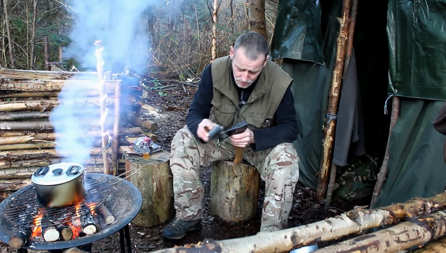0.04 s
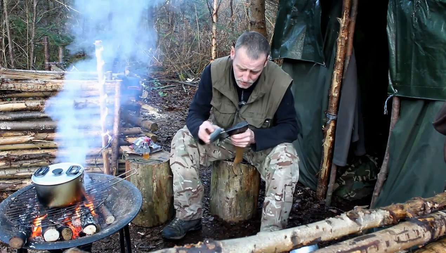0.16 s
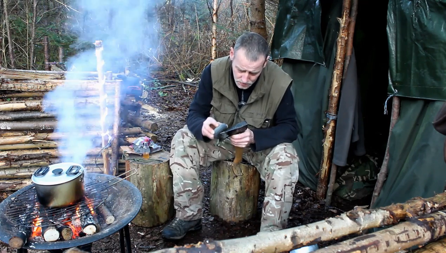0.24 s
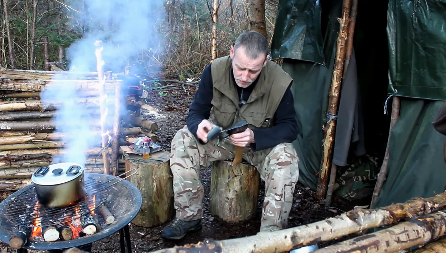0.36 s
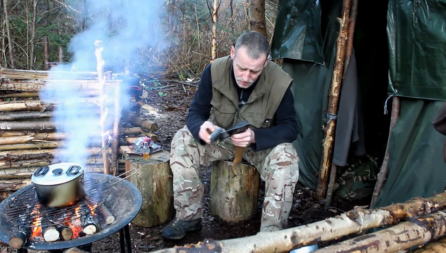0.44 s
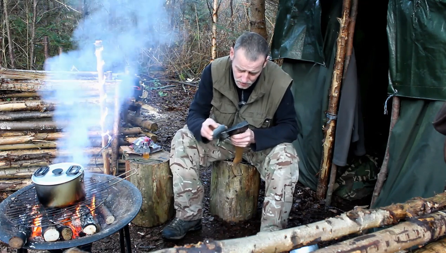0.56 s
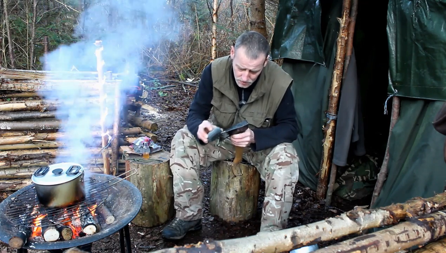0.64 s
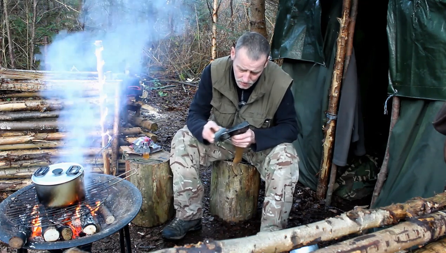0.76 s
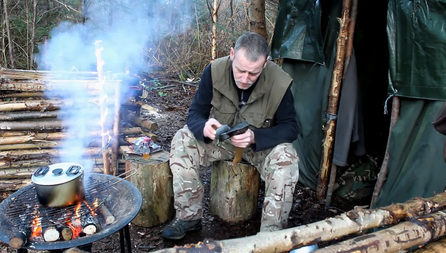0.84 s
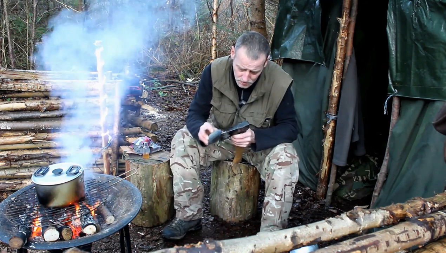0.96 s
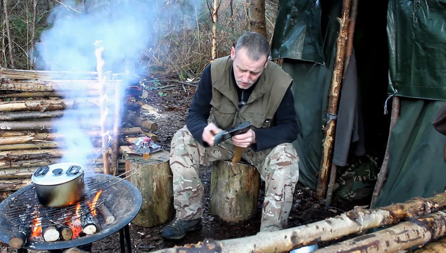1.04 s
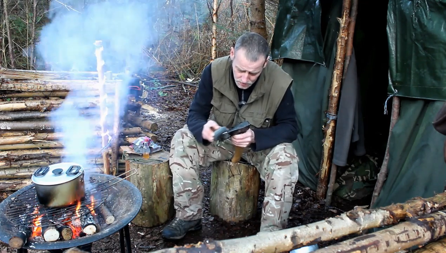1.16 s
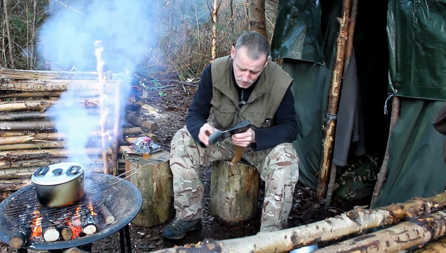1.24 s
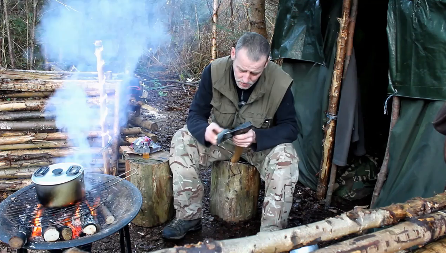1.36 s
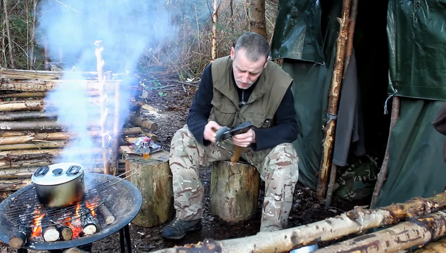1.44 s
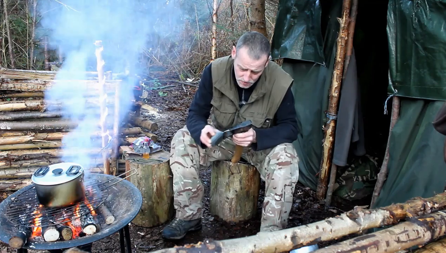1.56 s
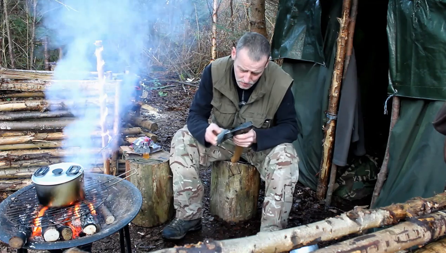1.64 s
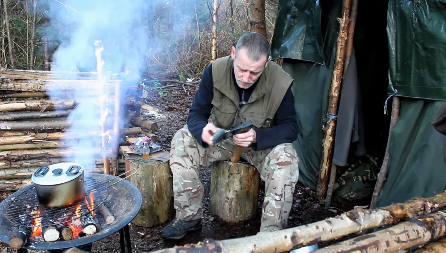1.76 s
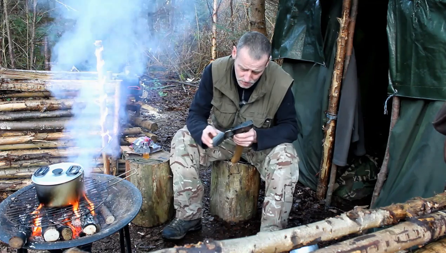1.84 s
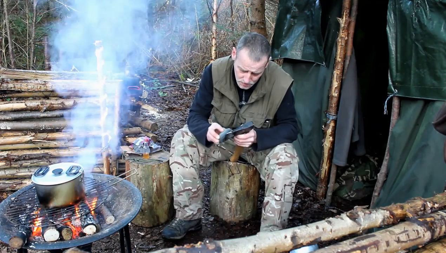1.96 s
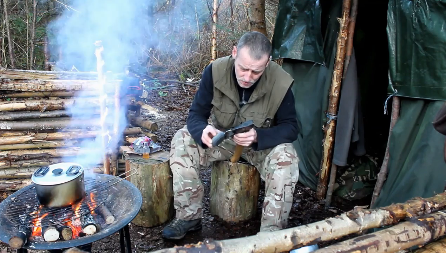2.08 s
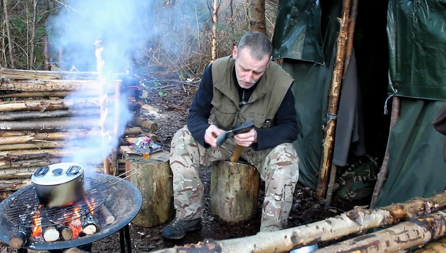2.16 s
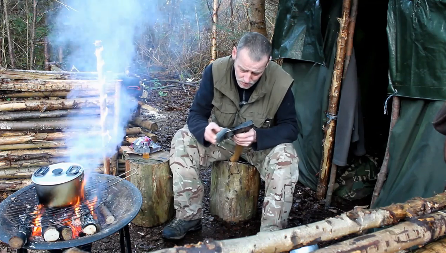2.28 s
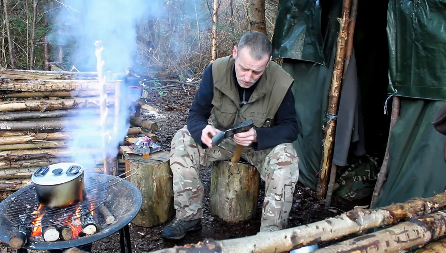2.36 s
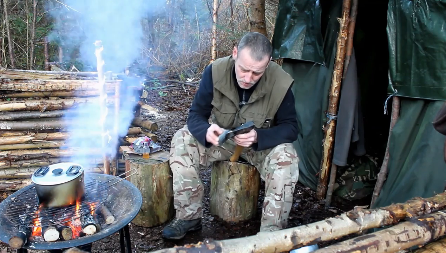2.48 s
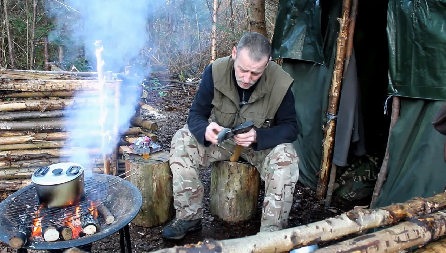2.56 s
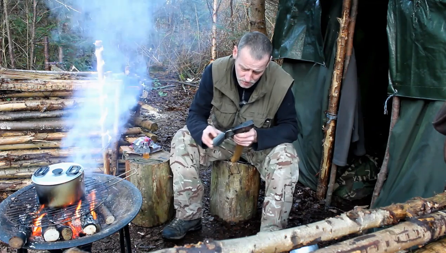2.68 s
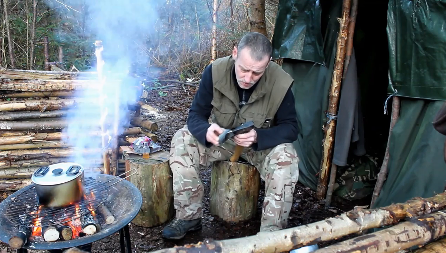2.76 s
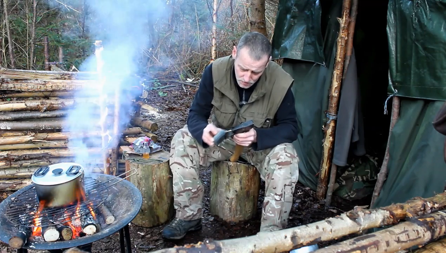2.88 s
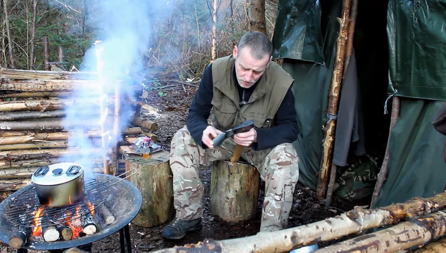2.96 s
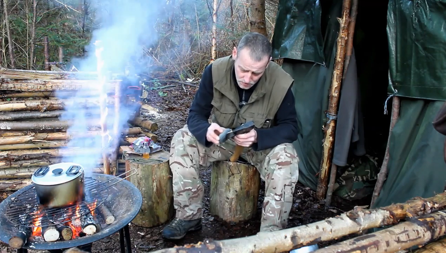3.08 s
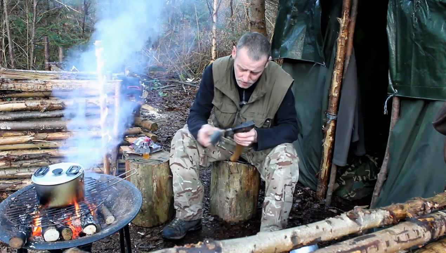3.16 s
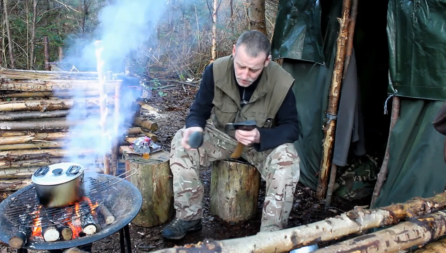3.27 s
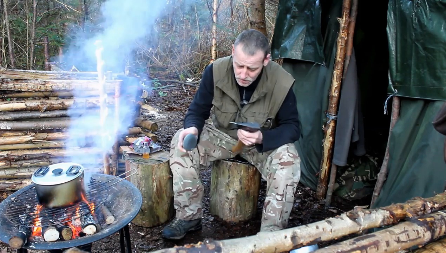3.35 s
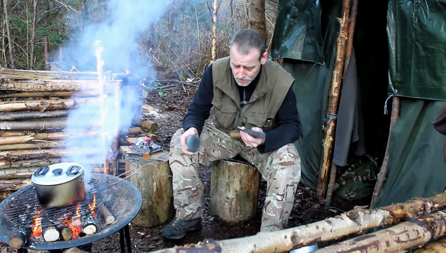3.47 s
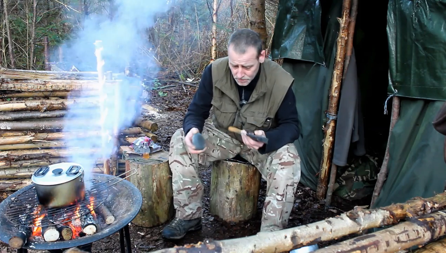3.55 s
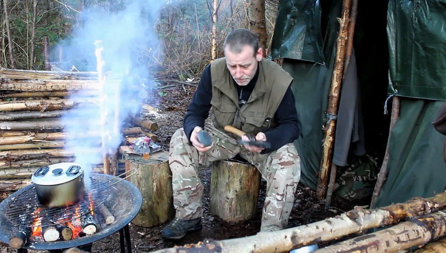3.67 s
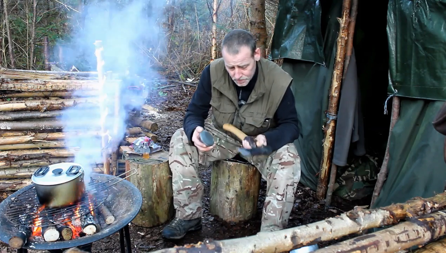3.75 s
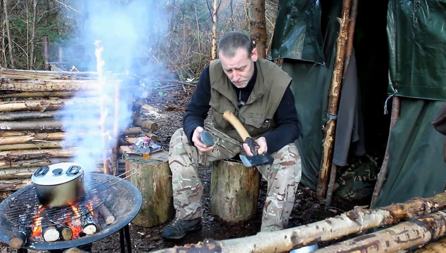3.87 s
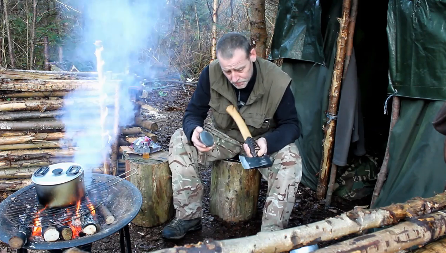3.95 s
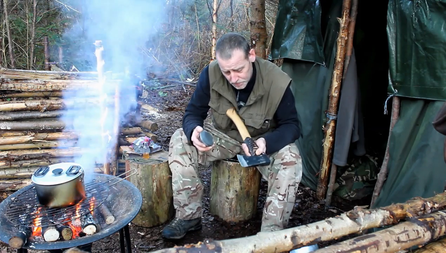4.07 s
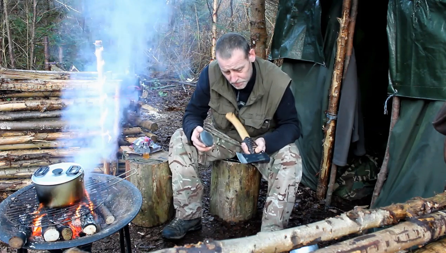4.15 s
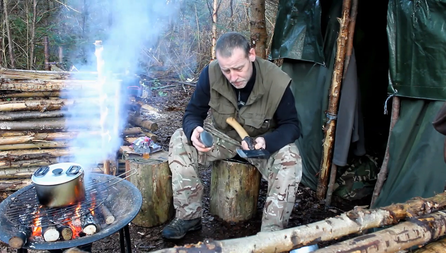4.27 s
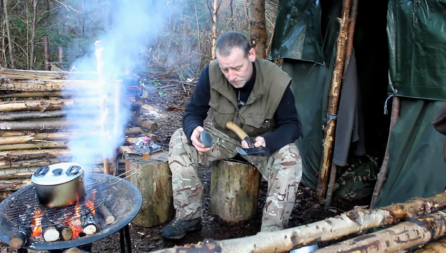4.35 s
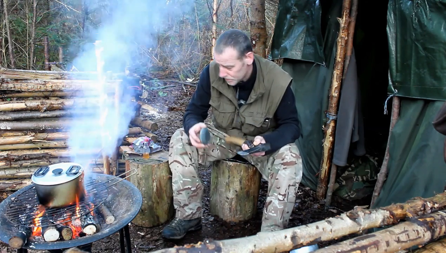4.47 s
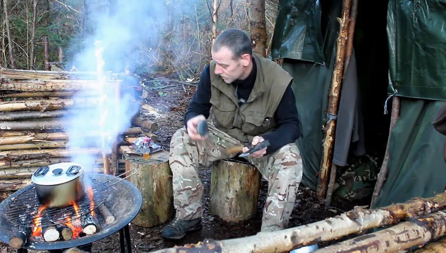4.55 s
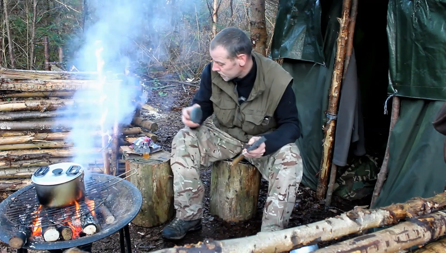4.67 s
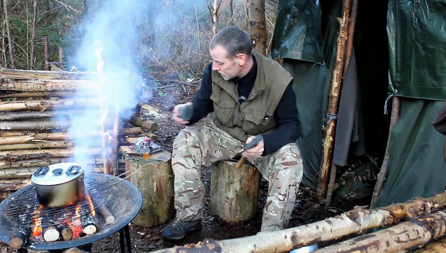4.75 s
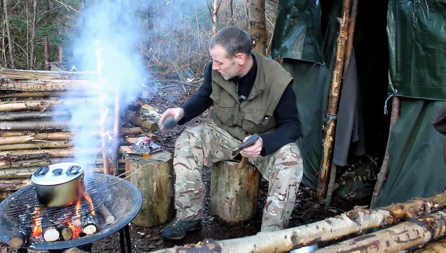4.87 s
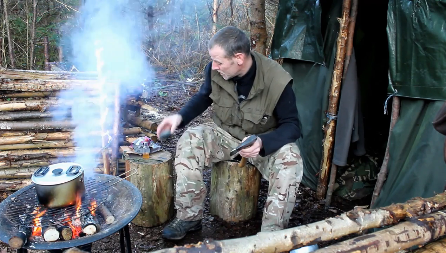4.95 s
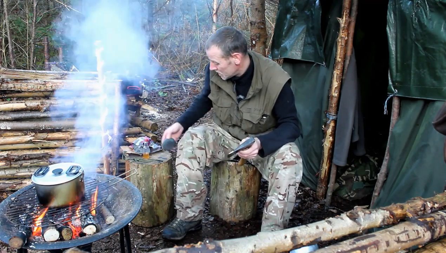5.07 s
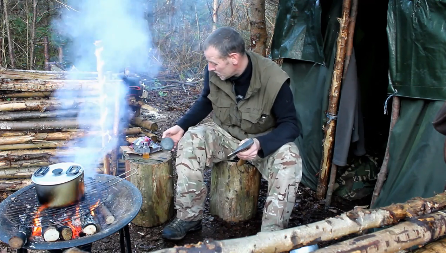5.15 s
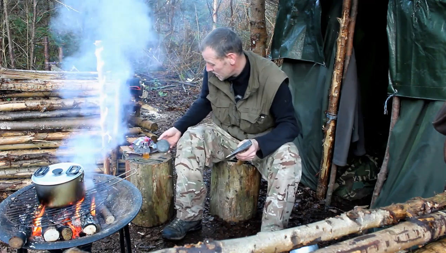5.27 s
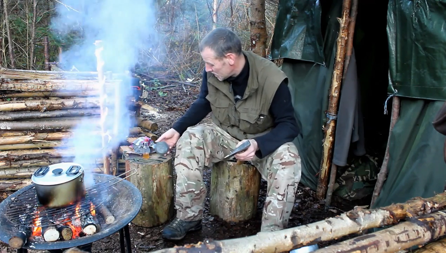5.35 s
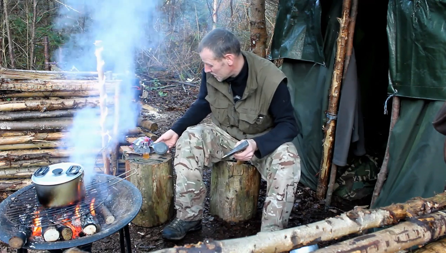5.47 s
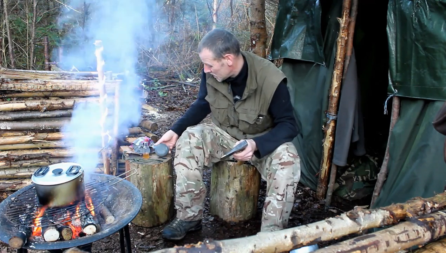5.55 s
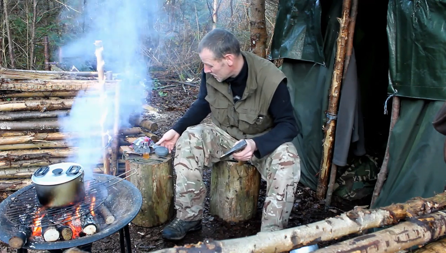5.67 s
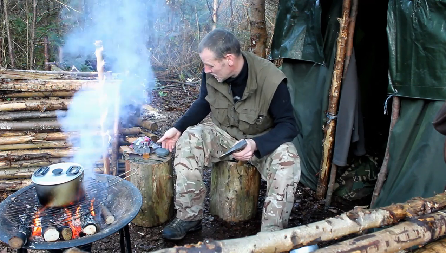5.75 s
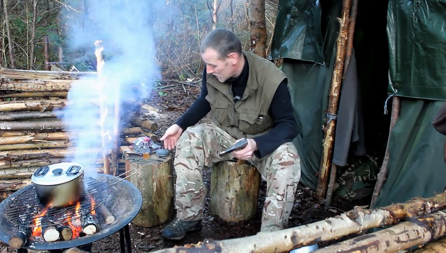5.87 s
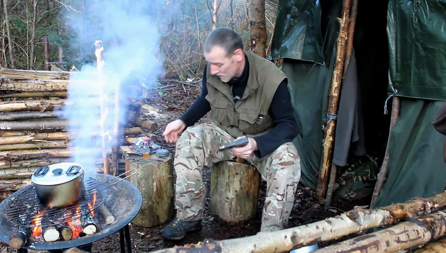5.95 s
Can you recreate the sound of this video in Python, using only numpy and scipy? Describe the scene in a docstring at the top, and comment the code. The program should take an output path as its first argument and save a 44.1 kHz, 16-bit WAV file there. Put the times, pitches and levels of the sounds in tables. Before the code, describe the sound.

Fast metallic rasping of a sharpening puck on steel outdoors, fire crackling throughout, then faint sleeve brushes, steam hiss and two small wooden knocks.

```python
"""Woodland camp, one microphone: a sharpening puck is rubbed in quick circles on an axe edge beside a wood fire.
First its grit plucks the damped resonances of steel and stone, which shift as the contact moves along the edge.
After the lift at 3.2 s sleeves brush; at 5.6 s the puck knocks on a stump and soon tips over.
Throughout, the fire pops (shaped pulses), ticks and hisses (filtered noise) over the soft rush of the wood;
from 3.4 s, gliding sines whistle faintly in its steam."""
import sys
import numpy as np
from scipy import signal
from scipy.fft import rfft, irfft, next_fast_len
from scipy.io import wavfile
from scipy.ndimage import map_coordinates

SR = 44100
rng = np.random.default_rng(int(sys.argv[2]) if len(sys.argv) > 2 else 0)


def transcribe(u):
    """Save the signal u as a 16-bit wav file named by the first command-line argument.

    u: samples, shape (n,) or (channels, n), limited to [-1, 1]; the rate is SR.
    q: integer samples, one column per channel.
    """
    v = np.clip(np.atleast_2d(u).T, -1, 1)
    q = np.round(v * 32767).astype(np.int16)
    wavfile.write(sys.argv[1], SR, q)


N = 265482  # samples

# slow-dying modes of the steel head: f/Hz, width/Hz, relative level/dB
STEEL_MODES = [(2010, 28, -7), (3240, 20, 3.5), (4240, 45, 0.5), (7300, 6.2, 1), (8360, 16, 10),
               (13370, 10, -2)]
# how far the swaying contact bends the low, middle and treble registers: lead/s per unit of sway
BEND_LEAD = (.00042, .00033, .00016)
LIFT_S = 3.203  # the puck starts to leave the edge
# on the thin edge the resonances slide down: in tune at this t/s, then falling by this share per second
GLIDE_S, GLIDE_PER_S = 1.17, 0.17


def honing():
    """One stream of grit drives three registers of the resonances that lie under the puck."""
    t, f = np.arange(N) / SR, grid()
    size = 2 * (len(f) - 1)
    place, levels = hand()
    tremor = amp(0.9 * wobble(70))
    contact = np.clip((LIFT_S - t) / 0.0059, 0, 1) * tremor
    force = contact * grit(grains_per_s=7000, size_db=1.5, clump_db=1.0, clump_rate=340)
    drives = rfft(force * amp(levels), size)

    # low, middle and treble, parted at 2700 and 6300 Hz
    below_bite = 1 / (1 + (f / 2700) ** 12)
    below_sing = 1 / (1 + (f / 6300) ** 16)
    registers = [below_bite, below_sing - below_bite, 1 - below_sing]

    # below about 720 Hz the resonances answer only a firm push, so they pulse with the hand
    firm_db, steepness, full_db = -36, 0.8, -30.5
    firmness_db = np.clip(steepness * (levels[0] - firm_db), -8, 2)
    deep_db = np.minimum(levels[0] + firmness_db, full_db)
    deep_drive = rfft(force * amp(deep_db), size)
    drives[0] += (deep_drive - drives[0]) / (1 + (f / 720) ** 10)

    rasp = np.zeros((len(registers), N))
    for k in range(len(REST_LEVELS)):
        response = rfft(axe(k), size)
        colours = [unit(response * band) for band in registers]
        sound = irfft(drives * colours)[:, :N]
        if k == 1:  # thin edge
            glide_s = -GLIDE_PER_S * (t - GLIDE_S) ** 2 / 2
            sound = np.array([warped(part, glide_s) for part in sound])
        nearness = np.clip(1 - abs(place - k), 0, 1)
        rasp += nearness * sound

    # the rocking hand stiffens and loosens the contact, which bends low and middle most
    sway = wobble(18)
    rasp = sum(warped(part, bend * sway) for part, bend in zip(rasp, BEND_LEAD))
    # the head rings on for a moment after the stone has left it
    ring = irfft(drives[1] * unit(resonances(STEEL_MODES)))[:N]
    return scatter(rasp + amp(-15.5) * ring, echo_db=-6.0, t60=0.099)[:N]


# the puck's way along the axe: t/s, place (0 heel, 1 thin edge, 2 bevel)
PLACES = [(.9, 0), (.96, 0.32), (1.04, 0.12), (1.08, 1), (1.36, 1), (1.42, 1.65), (1.52, 2)]
# from the bevel, every second circle swings out toward the toe: middle t/s, length/s, reach [0-1]
TOE_SWINGS = [(2.039, 0.16, 0.89), (2.31, 0.13, 0.77), (2.618, 0.15, 0.63), (2.91, 0.063, 0.9),
              (3.166, 0.049, 0.83)]
# the hand bears down in each circle, about seven times a second: middle t/s, length/s, push level/dB
PUSHES = [(0.082, 0.094, 5), (0.214, 0.08, 8), (0.358, 0.13, 1.5), (0.507, 0.031, 5), (0.624, 0.013, 10.5),
          (0.809, 0.065, 3), (1.003, 0.092, 5), (1.19, 0.03, 5), (1.424, 0.086, 6.5), (1.538, 0.11, 6.7),
          (1.658, 0.046, 8.5), (1.819, 0.077, 9), (1.954, 0.063, 8.5), (2.108, 0.082, 4.7),
          (2.217, 0.1, 4.5), (2.362, 0.084, 6), (2.507, 0.067, 3.5), (2.653, 0.082, 5.1), (2.79, 0.056, 3),
          (2.926, 0.078, 8), (3.064, 0.063, 6), (3.189, 0.032, 12.5)]
# register levels under a resting hand, rows heel, thin edge, bevel, toe: low/dB, middle/dB, treble/dB
REST_LEVELS = [(-41, -31.5, -35.5), (-44.5, -33, -30), (-40, -31.6, -36.5), (-39.8, -28.5, -26.5)]
# how keenly the grit cuts at the angle at which the puck is held: t/s, cut level/dB
CUT_LEVELS = [(0.0, 0.2), (0.56, -2.6), (0.64, 2.5), (0.7, -3), (0.93, 3), (1.03, 6.5), (1.07, 0.5),
              (1.11, 2), (1.36, -2.5), (1.42, 6.5), (1.53, 1.2), (2.1, -0.5), (2.21, -1.5), (2.39, 2.2),
              (2.47, -1.0), (3.12, 0.5), (3.2, 6.5)]
# a push loads the low register, bites a little in the middle, chokes the treble: dB per dB of push, by register
PUSH_BY_REGISTER = (1.033, 0.07, -.11)
# a keen cut drives middle and treble: dB per dB of cut, by register
CUT_BY_REGISTER = (-.15, 0.95, 0.99)
# catches on the edge, dull thud (tilt below 0) to bright scratch:
# t/s, decay/s, level/dB, tilt/dB per register
EDGE_CATCHES = [(.385, 0.02, 3, 4), (.768, .013, 7, -9), (.961, 0.026, 3.5, 1.5), (1.79, 0.021, 2.5, 1.5),
                (2.01, .0035, 4.5, 12), (2.106, 0.015, 3.5, -1), (2.774, 0.0096, 7, -4.5),
                (3.006, 0.008, 6, -4), (3.057, 0.0075, 7, -4.5), (3.163, .007, 5.5, 0.5)]


def hand():
    """Where the puck lies (0 heel to 3 toe), and the dB at which it drives low, middle and treble."""
    t, places = np.arange(N) / SR, np.arange(len(REST_LEVELS))
    swing = sum(reach * swell(s, length) for s, length, reach in TOE_SWINGS)
    place = np.clip(curve(PLACES) + swing, 0, places[-1])
    push = sum(db * swell(s, length) for s, length, db in PUSHES)

    levels = np.array([np.interp(place, places, rest_db) for rest_db in np.transpose(REST_LEVELS)])
    levels += np.outer(PUSH_BY_REGISTER, push)
    levels += np.outer(CUT_BY_REGISTER, curve(CUT_LEVELS))
    for s, decay, db, tilt_db in EDGE_CATCHES:
        fade = (t >= s) * np.exp(-((t - s) / decay) ** 2)
        levels += np.outer([db - tilt_db, db, db + tilt_db], fade)

    # the puck skips: the level sinks toward -7 dB and comes back at once on landing
    land_s, skip_length_s, skip_db = 3.004, 0.022, -7
    skip = (t < land_s) * np.exp(-((t - land_s) / skip_length_s) ** 2)
    return place, levels + skip_db * skip


def swell(s, length):
    """Rise, hold and fall of one movement of the hand, 0 to 1, centred on s."""
    squareness = 3  # 2 = a soft swell, more = a held push
    t = np.arange(N) / SR
    near, shape = abs(t - s) < 2 * length, np.zeros(N)
    shape[near] = np.exp(-abs(2 * (t[near] - s) / length) ** squareness)
    return shape


def grit(grains_per_s, size_db, clump_db, clump_rate):
    """Grains of many sizes snag on a surface, in irregular clumps; the force has rms 1."""
    snags = rng.random(N) < grains_per_s / SR
    sizes = rng.standard_normal(N) * amp(size_db * rng.standard_normal(N))
    clumps = amp(clump_db * wobble(clump_rate))
    return unit(snags * sizes * clumps)


# resonances of axe and puck: f/Hz, width/Hz, relative level/dB at the heel, thin edge, bevel, toe
AXE_MODES = [(451, 86, -16, -32, -13, -30), (634, 190, -18, -28, -13.5, -11.5), (781, 71, -9, -10, -8, -2),
             (995, 310, -9.5, -6.5, -56, -52), (1158, 100, -1, -11, 3.5, -5),
             (1450, 69, -9.5, -9, -6.5, -1), (1514, 134, -8.5, -32, -10.5, -8),
             (1790, 195, -10, -12.5, -7.5, -9), (2064, 78, -6.5, -12.5, -3, -2),
             (2344, 390, -16.5, -17, -40, -20), (2926, 520, -39, -12.5, -10, -10.5),
             (3297, 220, -34, -5, -10.5, -22), (3477, 136, -1.5, -4, -2, 1),
             (3675, 82, -9.5, -0.5, -7, -4.5), (3925, 44, -7, -4.5, -13, -8), (4252, 150, -9, -4, -1.5, -2),
             (4424, 106, 3, -12, 2.5, 6.5), (4640, 480, -9, -23, -18.5, -4),
             (4910, 71, -25, -12.5, -32, -17), (5325, 420, -14.5, -27, -15, -3),
             (5810, 200, -24, -19, -20.5, -11), (6260, 110, -14, -14, -15, -32),
             (7040, 390, -16.5, -13, -14.5, -29), (7475, 110, -3.5, -2, -6, 3),
             (7795, 210, -31, -5.5, -15.5, 4.5), (8140, 290, -31, -2.5, -12, -11),
             (8800, 840, -14, -12.5, -47, -20), (11800, 550, -25, -24, -23, -28),
             (13520, 170, -25, -17, -20, -31)]
# colour of the grit's force: f/Hz, relative level/dB
GRIT_COLOUR = [(80, -34), (200, -24), (400, -4), (1000, -3.5), (2200, 3), (2700, -6), (3400, 0), (6300, 0),
               (8500, 2), (9800, -10), (11000, -15.5), (13400, -16.5), (14600, -26), (16000, -35)]


def axe(place, valley_db=-32):
    """What one snagging grain sounds like at a place on the edge: resonant peaks over a floor."""
    hz, width, *level_db = np.transpose(AXE_MODES)

    def gain(f):
        peaks = (1 + (2 * (f[:, None] - hz) / width) ** 2) ** -1.5
        power = peaks @ amp(level_db[place]) ** 2 + amp(valley_db) ** 2
        return np.sqrt(power) * slope(GRIT_COLOUR, f)

    return pulse(gain)


def warped(x, lead_s):
    """x read ahead by a changing time, which bends its pitch."""
    return map_coordinates(x, [np.arange(N) + lead_s * SR])


# the sleeves brush as the axe is turned over: middle t/s, length/s, level/dB
SLEEVE_BRUSHES = [(3.595, 0.0073, -50), (3.642, 0.012, -58), (3.73, .022, -57), (3.817, 0.018, -53),
                  (3.895, 0.012, -46.5)]
# colour of the cloth: f/Hz, relative level/dB
CLOTH_COLOUR = [(300, -19), (1200, -2), (2600, -7), (4400, 1), (6000, -2.5), (8500, -11), (15000, -48)]


def sleeves():
    """Coarse cloth brushes in short, crackly swishes: clumped snags of fibre, filtered."""
    t = np.arange(N) / SR
    motion = sum(amp(db) * np.exp(-.5 * ((t - s) / length) ** 2) for s, length, db in SLEEVE_BRUSHES)
    fibres = grit(grains_per_s=3000, size_db=0.0, clump_db=1.5, clump_rate=310)
    return motion * unit(filtered(fibres, slope(CLOTH_COLOUR, grid())))


# the puck meets the stump: t/s, peak level/dB before scatter, upper part of the blow/dB, scatter t60/s
STUMP_KNOCKS = [(5.636, -25.5, -13.5, 0.032), (5.8712, -24, 3, 0.13)]
# modes of the stump: f/Hz, width/Hz, relative level/dB
STUMP_MODES = [(250, 180, -17), (613, 600, -10), (930, 140, 4.5), (1072, 95, 3), (1490, 190, -1),
               (2610, 210, -3.5)]


def knocks():
    """A blow rings the stump's modes: a dull knock on setting down, a brighter one on tipping over."""
    track = np.zeros(N)
    wood = irfft(resonances(STUMP_MODES))[:SR // 20]
    for s, db, upper_db, rattle_s in STUMP_KNOCKS:
        colour = [(100, 1), (1200, -0.5), (2600, upper_db), (5000, upper_db - 7), (12000, -20)]
        blow = pulse(lambda f: slope(colour, f))
        knock = signal.fftconvolve(blow, wood)
        knock *= amp(db) / abs(knock).max()
        add(track, s, scatter(knock, echo_db=-5, t60=rattle_s))
    return track


# the fire pops: t/s, peak level/dB before the longer scatter, pitch f/Hz,
# body control/dB, top control/dB (both offset along the spectrum)
FIRE_POPS = [(.2409, -11.5, 4440, -19, -9), (.5566, -19, 4470, -15, -31), (1.715, -18, 4190, -7, -22),
             (1.7956, -11, 4500, -24, -32), (2.3584, -23, 3470, -20, -31), (2.8396, -21, 3520, -12, -27),
             (3.084, -27, 4410, -12, -20), (4.2413, -28, 9050, -22, -21), (4.2674, -7.5, 7200, -21, -34),
             (4.411, -19.5, 6100, -40, -22.5), (4.5575, -32, 6040, -27, -23),
             (4.813, -27.5, 6620, -34, -22), (4.847, -21.5, 6500, -36, -21.5),
             (4.9202, -23.5, 7600, -42, -15), (4.9871, -15, 7040, -28, -38), (5.0711, -22, 6200, -33, -30),
             (5.2844, -29, 6040, -1, -29), (5.3506, -10, 7670, -41, -21), (5.844, -26, 8050, -33, -26)]


def pops(ground_s=0.008, ground_db=-17):
    """Pockets of steam burst in the logs: a sharp crack, a short splintering and a bounce off the ground."""
    track = np.zeros(N)
    for s, db, hz, low_db, top_db in FIRE_POPS:
        middle_db = 1 + 0.56 * low_db  # more body brings a fuller middle
        body = [(150, low_db - 21), (1000, low_db + 9.5)]
        crest = [(min(hz / 2, 3400), middle_db), (.82 * hz, middle_db / 2), (hz, 0), (hz + 600, -2)]
        top = [(max(hz + 900, 9700), top_db + 10.5),
               (max(hz + 1500, 12500), top_db + 1.5),
               (16500, top_db - 25.5)]
        colour = body + crest + top
        crack = scatter(pulse(lambda f: slope(colour, f)), echo_db=-10, t60=0.002)
        crack = scatter(amp(db) * crack / abs(crack).max(), echo_db=-9, t60=0.066)
        add(track, s + 0.00082, crack)
        add(track, s + ground_s, amp(ground_db) * crack)
    return track


def embers(per_s, db, size_db):
    """Tiny random ticks of the burning wood, each a coloured pulse with a short scatter."""
    ticks = rng.random(N) < per_s / SR
    sizes = amp(db + size_db * np.clip(rng.standard_normal(N), -2, 2))
    colour = [(300, -20), (1500, -7), (7500, 0), (10000, -8), (16000, -24)]  # f/Hz, level/dB
    tick = scatter(pulse(lambda f: slope(colour, f)), echo_db=13, t60=.015)
    return signal.fftconvolve(ticks * sizes, tick / abs(tick).max())[:N]


# swell of the steam from the damp logs: t/s, level/dB before a 4 dB trim
STEAM_LEVELS = [(3.3, -56), (3.84, -59), (4.54, -52.5), (4.72, -47), (5.02, -49.5), (5.66, -51),
                (5.87, -53)]
# colour of the hiss: f/Hz, relative level/dB
JET_COLOUR = [(2500, -33), (4800, -10), (5600, -2.5), (6150, -0.5), (6900, -4.5), (7800, -3), (9500, -14.5),
              (15000, -44)]
# thin gliding whistles: start t/s, length/s, start f/Hz, end f/Hz, level/dB
STEAM_WHISTLES = [(3.39, .17, 4450, 5700, -57), (4.58, .2, 3950, 3600, -63), (5.18, .14, 6100, 6000, -58),
                  (5.35, .22, 4300, 4800, -61), (5.61, .12, 7100, 7700, -53), (5.57, .17, 5750, 6050, -58),
                  (5.72, .29, 4100, 4750, -61)]


def steam():
    """Damp wood hisses, and narrow cracks sputter and whistle, mostly upward as the pressure builds."""
    hiss = unit(filtered(rng.standard_normal(N), slope(JET_COLOUR, grid())))
    track = amp(curve(STEAM_LEVELS) - 4.0 + wobble(40)) * hiss
    for s, length, start_hz, end_hz, db in STEAM_WHISTLES:
        u = np.linspace(0, 1, int(length * SR))
        waver = .016 * wobble(600)[:len(u)]
        sputter_db = 2 * wobble(60)[:len(u)]
        hz = (start_hz + (end_hz - start_hz) * u) * (1 + waver)
        tone = np.sin(2 * np.pi * np.cumsum(hz) / SR)
        fade = np.sqrt(abs(np.sin(np.pi * u)))
        add(track, s, amp(db + sputter_db) * fade * tone)
    return track


# colour of the open air: f/Hz, relative level/dB per Hz
AIR_COLOUR = [(15, -71), (25, -25), (64, -11), (129, -9), (173, -5), (215, -5), (305, -3), (399, -1),
              (582, 0), (1240, -1.5), (2850, -5), (4750, -5), (6210, -14), (15500, -26)]


def air():
    """The soft, even rush of the wood and the flames: filtered noise at a barely drifting level."""
    rush = unit(filtered(rng.standard_normal(N), slope(AIR_COLOUR, grid())))
    return amp(-55.5 + 0.33 * wobble(4.99)) * rush


def amp(db):
    """Decibels to gain."""
    return 10 ** (np.asarray(db) / 20)


def unit(x):
    """x at rms 1."""
    return x / np.sqrt(np.mean(np.abs(x) ** 2) + 1e-20)


def curve(rows):
    """(t/s, value) rows as one value per sample."""
    return np.interp(np.arange(N) / SR, *np.transpose(rows))


def wobble(rate):
    """A smooth random curve, rate knots a second."""
    knots = rng.standard_normal(int(N * rate / SR) + 4)
    return map_coordinates(knots, [np.arange(N) * rate / SR])


def grid():
    """The frequencies in Hz on which responses are given."""
    return np.fft.rfftfreq(2 * next_fast_len(N // 2 + SR // 4), 1 / SR)


def filtered(x, response):
    """x through a response given on the grid."""
    size = 2 * (len(response) - 1)
    return irfft(rfft(x, size) * response)[:len(x)]


def slope(points, hz):
    """Gain of (f/Hz, level/dB) points on a log frequency axis."""
    f, db = np.transpose(points)
    return amp(np.interp(np.log(hz + 1), np.log(f), db))


def resonances(modes):
    """Causal response of (f/Hz, width/Hz, level/dB) modes of alternating sign."""
    f = grid()
    total = 0
    for k, (c, w, db) in enumerate(modes):
        total = total + (-1) ** k * amp(db) * 1j * f * w / (c * c - f * f + 1j * f * w)
    return total


def pulse(gain):
    """The sharpest causal (minimum-phase) pulse whose spectrum is gain(Hz)."""
    size = 2048
    cepstrum = irfft(np.log(gain(np.fft.rfftfreq(size, 1 / SR)) + 1e-9))
    # folding the cepstrum forward in time gives the minimum phase
    cepstrum[1:size // 2] *= 2
    cepstrum[size // 2 + 1:] = 0
    return irfft(np.exp(rfft(cepstrum)))


def add(track, s, sound):
    """Mix a sound into a track at time s."""
    part = track[max(round(s * SR), 0):][:len(sound)]
    part += sound[:len(part)]


def scatter(x, echo_db, t60):
    """A sound followed by its scatter from ground, logs and tarpaulin: decaying noise."""
    t = np.arange(SR // 8) / SR
    tail = rng.standard_normal(len(t)) * amp(-60 * t / t60) * (t > .001)
    tail *= amp(echo_db) / np.linalg.norm(tail)
    tail[0] = 1  # the direct sound
    return signal.fftconvolve(x, tail)


def scene():
    """Everything as heard at one microphone."""
    fire = pops() + embers(per_s=22, db=-47, size_db=3) + steam()
    return (honing() + sleeves() + knocks() + fire + air())[None]


def record(dry):
    """The recorder rolls off steeply at its band limit of 15300 Hz."""
    return filtered(dry[0], 1 / (1 + (grid() / 15300) ** 70))[None]


dry = scene()
out = record(dry)
transcribe(out)
```